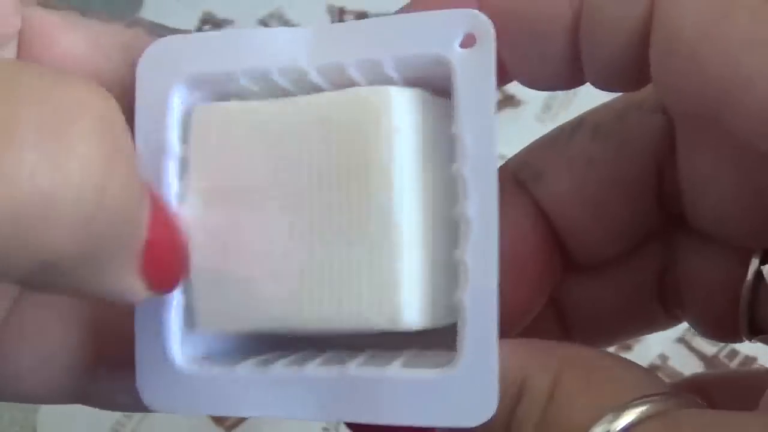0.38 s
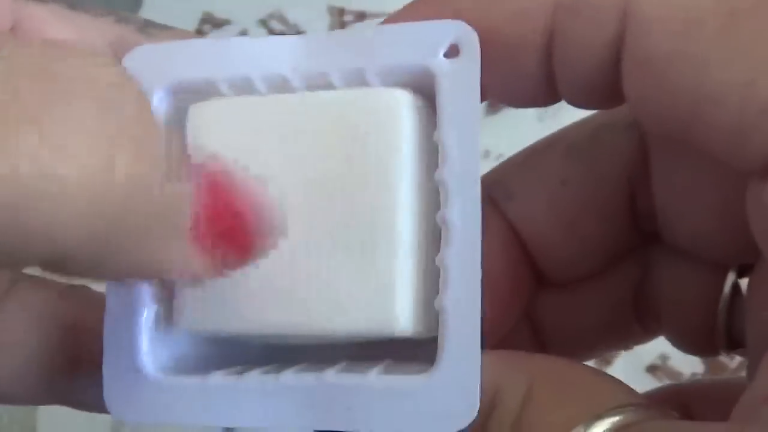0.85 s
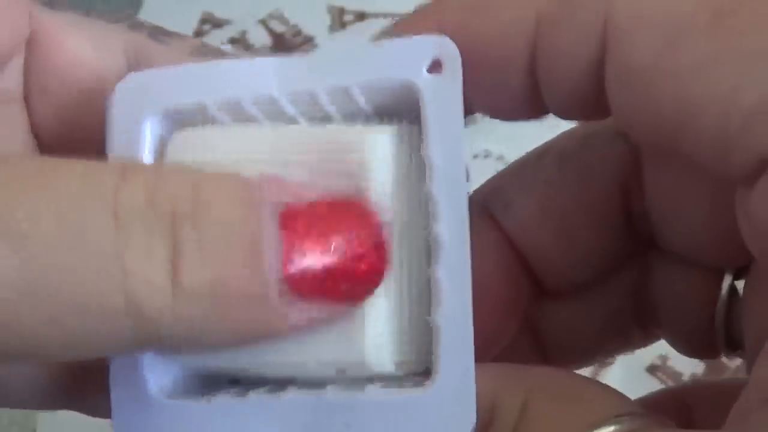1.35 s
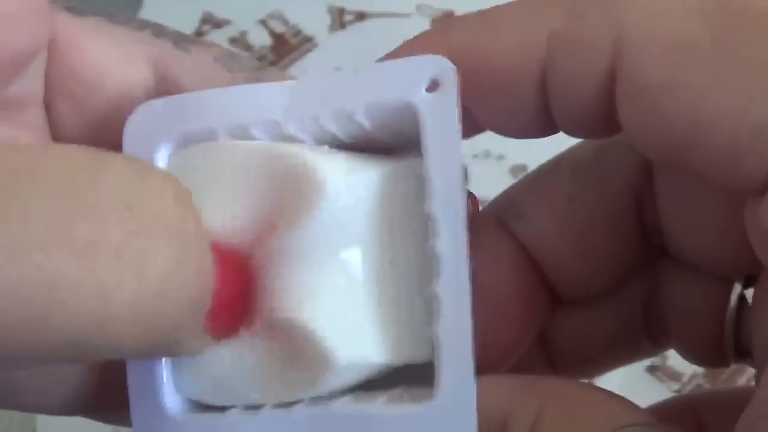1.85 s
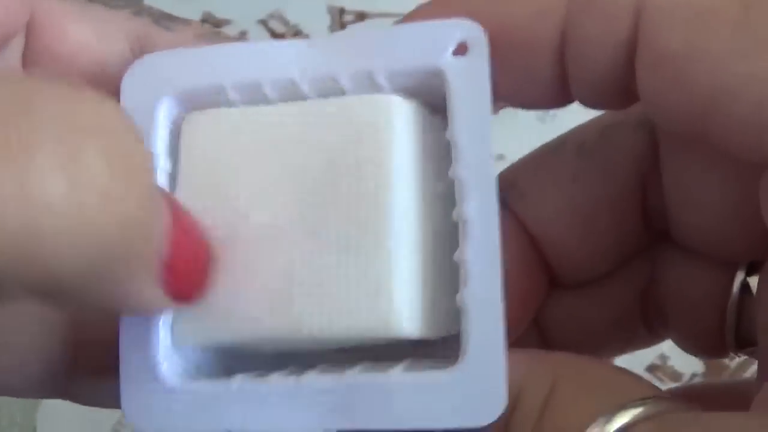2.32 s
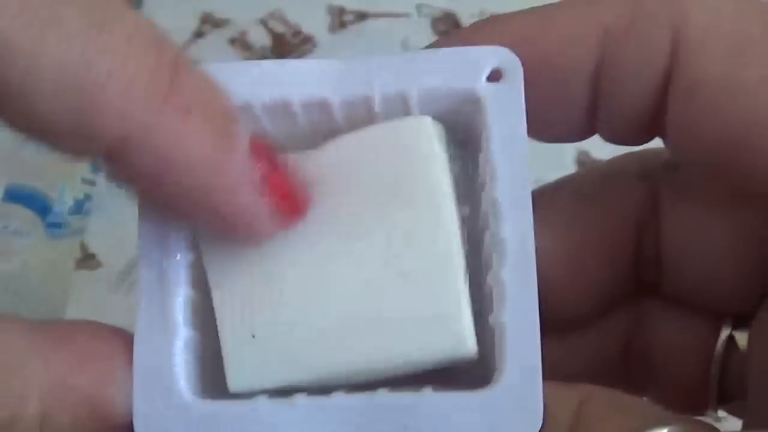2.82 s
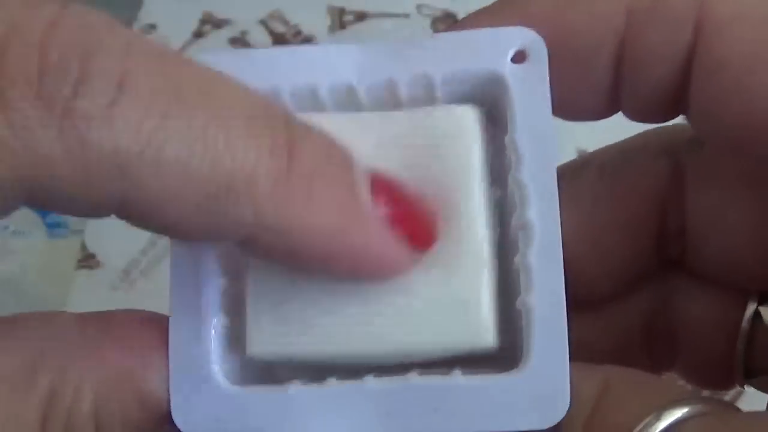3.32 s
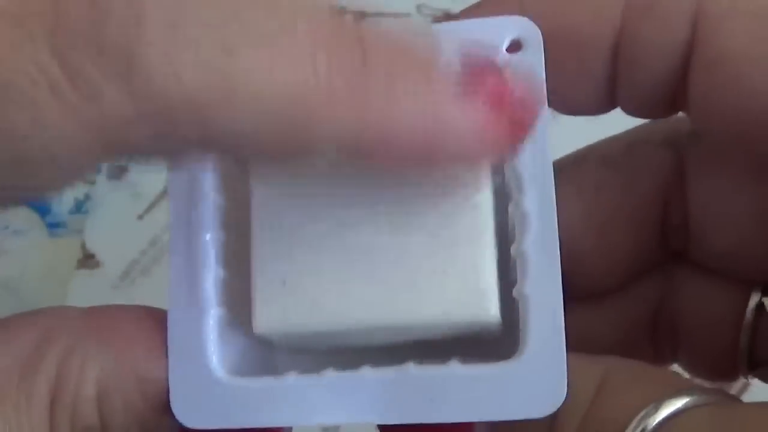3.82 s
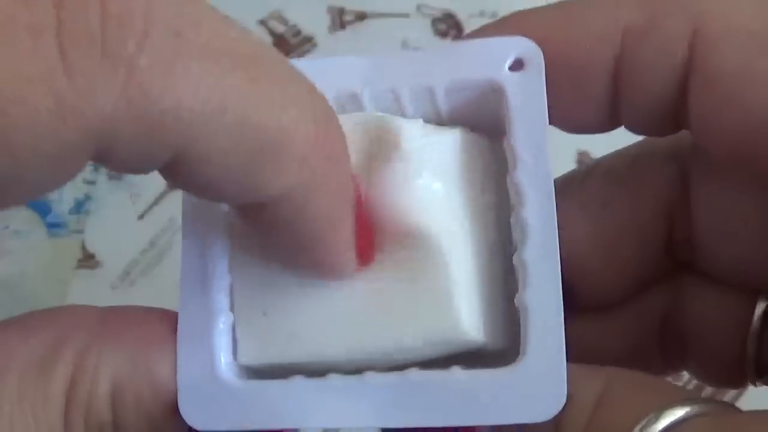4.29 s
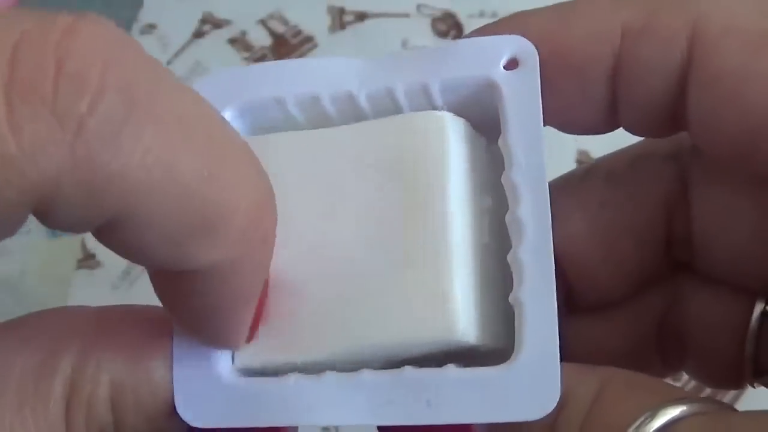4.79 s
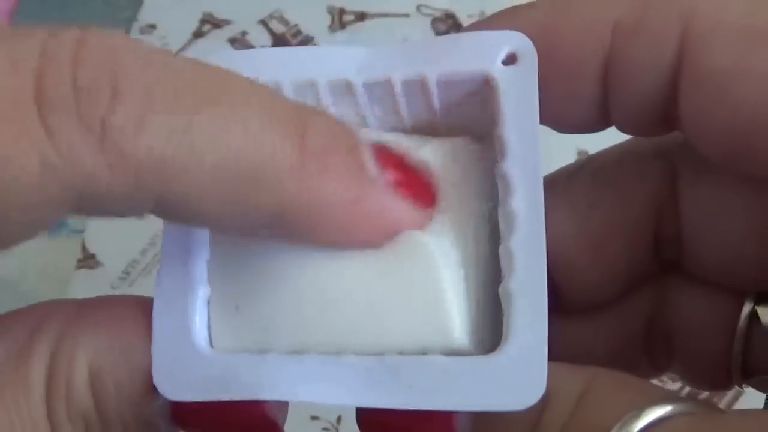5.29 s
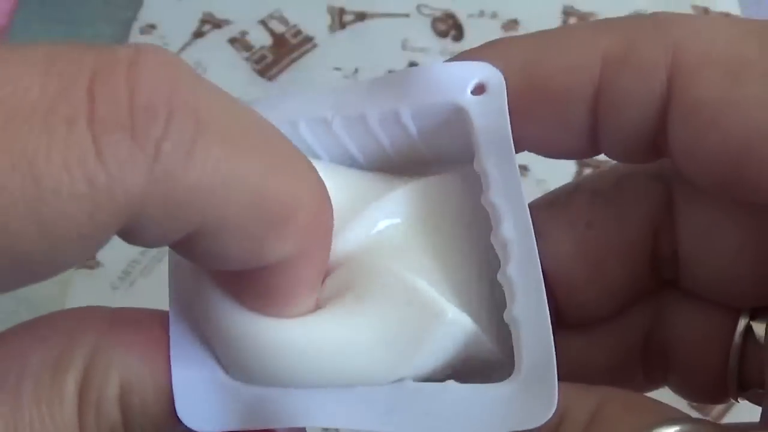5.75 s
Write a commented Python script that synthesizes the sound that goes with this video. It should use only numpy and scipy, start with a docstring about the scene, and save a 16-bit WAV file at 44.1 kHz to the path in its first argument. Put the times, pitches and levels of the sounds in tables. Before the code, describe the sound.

Sticky snaps, clicks and fine crackle as a finger peels and presses a tacky soft toy in a small thin plastic tray.

```python
"""Sticky pops, clicks and fine crackle: a finger presses a tacky soft toy in a thin plastic tray, heard close up.
Each pop is a ragged, snapping noise burst through three resonators: low air gap, tray wall, high sticky film.
One sharp click near 4.48 s, not a peel, is built alike. Random grains ring the same parts for the crackle;
smooth noise makes the fingertip's sliding hiss and soft pats make the gap hum. Behind lie a fridge-like motor hum
of wavering sines, coloured room noise, swelling rumble, a few dull thuds and a faint throbbing camera whine."""
import sys
import numpy as np
from scipy import signal
from scipy.fft import rfft, irfft
from scipy.io import wavfile
from scipy.ndimage import uniform_filter1d

SR = 44100
rng = np.random.default_rng(int(sys.argv[2]) if len(sys.argv) > 2 else 0)


def pcm_store(signal):
    """Save signal as 16-bit PCM."""
    levels = np.round(np.clip(np.atleast_2d(signal), -1, 1) * 32767)
    wavfile.write(sys.argv[1], SR, levels.astype(np.int16).T)


def level_to_linear(level):
    """Convert decibel levels to linear amplitude factors, elementwise."""
    exponent = np.asarray(level, float) / 20
    return 10 ** exponent


N = 259749
LEAD = 128  # samples of ragged noise ahead of each snap

# Pops of the peeling toy, and at 4.4777 s a sharp click that is not a peel; peak levels before the bass cut:
# (time [s], air gap pitch [Hz], air gap level [dB], tray wall level [dB], film crack level [dB])
POPS_AND_CLICK = [(0.0101,2230,-49,-33,-33),(.033,2260,-48,-35.5,-39),(.0776,2060,-47,-37.5,-39),(0.0883,660,-67,-35,-34.5),(.101,1560,-58,-47,-31),
                  (0.3144,2140,-50,-43,-37),(.353,2130,-59,-24,-27),(0.3577,1590,-37,-26,-41),(0.375,2050,-41,-37,-39),(0.382,2180,-42,-50,-44),(.3892,1920,-39,-35,-40),(.396,1920,-65,-35,-45),
                  (.4032,1350,-32.5,-28,-30),(0.42,1870,-48,-35,-40),(0.4366,1670,-54,-34,-46),(.4447,1330,-50,-36,-39),(.459,810,-48,-49,-45),(.4873,798,-27,-20.5,-30),
                  (.632,800,-52,-38,-36),(0.662,731,-31.5,-22,-23.5),(0.665,788,-30,-29.5,-29),(.7164,1100,-44,-47,-29),(0.7755,1060,-57,-40,-23.5),
                  (.8385,1390,-33,-25.5,-23.5),(0.8492,835,-46,-33,-43),(0.8677,914,-28,-24.5,-22.5),(.8705,786,-37,-22.5,-19.5),(1.084,1140,-40,-53,-25),
                  (1.1459,1680,-33,-36,-31),(1.1538,650,-58,-40,-38),(1.171,960,-47,-33.5,-31.5),(1.1902,1310,-38,-31,-30),(1.2094,1150,-54,-30,-30.5),(1.2228,1840,-35,-32,-61),
                  (1.2362,2080,-35,-30,-26),(1.2396,750,-52,-26,-22.5),(1.2429,760,-32,-24.5,-22),(1.252,760,-48,-40,-32),(1.3596,990,-40.5,-48,-43),(1.4338,1230,-53,-45,-41),(1.4522,1270,-38.5,-57,-50),
                  (1.475,1100,-45,-37,-30),(1.5599,1050,-35.5,-46,-27),(1.584,770,-50,-32,-25),(1.601,1350,-25.5,-22,-23.5),(1.613,1030,-65,-42,-36),(1.622,1880,-58,-40,-39),(1.632,760,-53.5,-33,-32),
                  (1.6512,1840,-52,-44,-27),(1.66,1790,-45,-22.5,-24.5),(1.6622,1780,-32,-33,-32),(1.674,760,-25.5,-24,-24),(1.6959,900,-63,-44,-43),(1.847,1540,-43,-51,-28),
                  (1.9529,2000,-45,-35,-39),(1.9733,1350,-28,-23.5,-23.5),(1.9901,1860,-53,-32,-43),(1.9992,1550,-46,-31,-41),(2.0078,2160,-43,-32,-41),
                  (2.024,1860,-45,-29,-22),(2.034,1750,-40,-25,-37),(2.038,1810,-59,-50,-29.5),(2.044,1870,-58,-38,-26),(2.05,1850,-46,-34,-30),(2.0548,1900,-26.5,-14.5,-10.5),
                  (2.0611,783,-29,-23,-25.5),(2.1558,990,-44.5,-61,-60),(2.1771,800,-50,-47,-28.5),(2.2603,1120,-52,-49,-24.5),(2.2967,1070,-50,-58,-29),(2.3082,660,-56,-46,-34),
                  (2.322,1110,-59,-33.5,-27),(2.346,1350,-33,-23.5,-24.5),(2.3545,1390,-60,-29,-31),(2.3826,765,-46,-33.5,-40),(2.401,1870,-40,-27,-21.5),
                  (2.412,760,-26,-23,-23.5),(2.6824,680,-68,-40,-28),(2.7802,1940,-38,-33.5,-20),(2.8682,1070,-36,-42.5,-26),(2.97,1730,-54,-47,-34),(3.1003,1430,-28,-32,-36.5),
                  (3.124,740,-40.5,-38,-39),(3.1344,863,-27.5,-25.5,-26),(3.14,815,-14,-13.5,-8.5),(3.15,2220,-27,-28,-26),(3.154,1940,-29,-31,-26),
                  (3.181,1340,-45,-44,-42),(3.4444,783,-30.5,-23.5,-27),(3.4489,1630,-36,-31,-24.5),(3.675,910,-47,-53,-29.5),(3.6833,955,-52,-56,-38),(3.6927,1090,-42,-53,-25),(3.6973,1080,-40.5,-33,-20),
                  (3.7225,900,-29.5,-30,-32),(3.7271,1015,-21.5,-25.5,-15),(3.7295,1970,-50,-18,-19),(3.7445,720,-38,-30.5,-25),(3.88,790,-30.5,-12.5,-22),(3.8827,860,-31.5,-18.5,-14),
                  (3.888,850,-36,-24.5,-30),(3.921,1060,-42,-49,-45),(3.925,1100,-42,-42,-34.5),(3.9613,1750,-28,-40,-35),(3.966,940,-34,-26.5,-32),(3.9718,966,-21.5,-16.5,-23),
                  (3.9828,1270,-33,-40,-39),(3.9947,805,-47,-46,-32),(4.0238,1200,-61,-46,-42),(4.1632,1660,-41,-32,-29.5),(4.2959,1380,-40.5,-41,-31),
                  (4.4777,1140,-38.5,-38,-25.5),(4.613,1770,-65,-42,-45),(4.64,1500,-56,-46,-40),(4.662,1500,-64,-46,-50),(4.697,1500,-62,-50,-57),(4.734,910,-63,-43,-45),(4.75,2150,-57,-31,-37),(4.763,2240,-52,-40,-29),(4.7667,2340,-26,-37,-31),(4.7704,2200,-39,-39,-44),
                  (4.783,2170,-62.5,-32,-38),(4.823,700,-58,-52,-30),(4.8375,1750,-41,-41,-27),(4.8457,1860,-43,-40,-27),(4.8577,1520,-31,-30.5,-35),
                  (4.875,1110,-51,-40,-41),(5.0946,1930,-53,-47,-29),(5.214,760,-54,-40.5,-58),(5.328,780,-56,-52,-35),(5.385,800,-62,-68,-44),(5.7995,2160,-47,-37.5,-37),(5.8462,810,-82,-44,-31.5),(5.8775,2300,-41,-47,-28)]
# Fingertip pats on the toy, with peak levels before the bass cut:
# (time [s], air gap pitch [Hz], length [s], level [dB])
FINGER_PATS = [(0.704, 1110, 0.028, -48), (0.767, 1040, 0.016, -43), (0.797, 1000, 0.019, -54),
               (1.066, 1190, 0.014, -40), (1.075, 1100, 0.014, -46), (1.445, 1080, 0.017, -43),
               (1.849, 1100, 0.03, -46), (2.257, 1100, 0.026, -50), (2.71, 830, 0.015, -59),
               (2.802, 816, 0.02, -55), (3.417, 940, 0.013, -50), (3.664, 1040, 0.032, -49),
               (3.91, 1020, 0.025, -45), (4.219, 1120, 0.05, -53.5), (4.324, 1100, 0.02, -56)]
# Resonances of the thin tray wall: (frequency [Hz], t60 [s], relative level [dB])
WALL_MODES = [(3040, 0.0015, -8), (3802, 0.0037, 7.5), (4277, 0.0076, 1), (4800, 0.0015, 6)]
# Resonances of the sticky film: (frequency [Hz], t60 [s], relative level [dB])
FILM_MODES = [(7060, 0.0016, 1.2), (8330, 0.0031, 1.41), (9460, 0.0029, 2.2), (11880, 0.0018, 4.5)]


def timeline():
    """Seconds of each sample."""
    return np.arange(N) / SR


def unit(x):
    """Scale to rms 1."""
    return x / np.sqrt(np.mean(x ** 2))


def walk(rate):
    """Random levels held 1 / rate s and smoothed twice into a slow drift of rms 1."""
    hold = int(SR / rate)
    steps = np.repeat(rng.standard_normal(N // hold + 1), hold)
    smooth = uniform_filter1d(uniform_filter1d(steps, hold), hold)
    return unit(smooth[:N])


def colour(points):
    """Noise shaped to a spectrum of (frequency [Hz], relative level [dB]) points."""
    hz, db = np.transpose(points)
    f = np.maximum(np.fft.rfftfreq(N, 1 / SR), 1)
    shape = level_to_linear(np.interp(np.log(f), np.log(hz), db))
    return irfft(rfft(rng.standard_normal(N)) * shape, N)


def ring(modes, detune=0.):
    """Impulse response of decaying modes; neighbours swing in opposite senses."""
    t = np.arange(2048) / SR
    hz, t60, db = np.transpose(modes)[:, :, None]
    sign = (-1) ** np.arange(len(modes))[:, None]
    swing = np.sin(2 * np.pi * hz * (1 + detune) * t)
    decay = 1000. ** (-t / t60)
    return np.sum(sign * level_to_linear(db) * swing * decay, axis=0)


def burst(noise, rise_s, fall_s):
    """Ragged noise grows ever harder, as a tearing bond does, snaps and dies."""
    snap_size = 3.2  # final break against the ragged noise around it
    t = (np.arange(len(noise)) - LEAD) / SR
    ragged = noise * np.exp(np.where(t < 0, t / rise_s, -t / fall_s))
    snap = snap_size * np.sign(noise[0]) * (t == 0)
    return ragged + snap


def strike(push, response, db):
    """A push rings a resonator; the result peaks at db."""
    y = signal.fftconvolve(push, response)
    return y * level_to_linear(db) / np.abs(y).max()


def swells(start, hold, db, swell, fade, rest_db):
    """Gain of events that rise, hold and fall by straight slopes in dB/s over a resting level."""
    power = np.full(N, level_to_linear(2 * rest_db))
    for s, h, peak in zip(start, hold, db):
        first = max(int((s - 0.1) * SR), 0)
        last = min(int((s + h + 0.1) * SR), N)
        i = np.arange(first, last)
        t = i / SR - s
        level = peak + swell * np.minimum(t, 0) - fade * np.maximum(t - h, 0)
        power[i] += level_to_linear(2 * level)
    return np.sqrt(power)


def pops(rise_s, fall_s, detune):
    """Each peel pops once, the tray bent anew so that modes shift; the lone click is built the same way."""
    # ring time of a deep gap; tighter, higher gaps die sooner
    deep_t60_s, deep_hz, slope = 0.018, 800, 1.4
    out = np.zeros(N + 4096)
    noise = rng.standard_normal((len(POPS_AND_CLICK), 3, 256))
    shift = rng.standard_normal((len(POPS_AND_CLICK), 2, 4, 1))
    for (s, hz, gap_db, wall_db, film_db), n, d in zip(POPS_AND_CLICK, noise, shift):
        # the gap rings on its own pitch and spills a short broad knock around it
        gap_t60 = deep_t60_s * (deep_hz / hz) ** slope
        cavity = [(hz, gap_t60, 0), (1350, 0.004, -2), (1900, 0.006, -6)]
        pop = strike(burst(n[0], 0.00017, 0.00036), ring(cavity), gap_db)
        pop = pop + strike(burst(n[1], rise_s, fall_s), ring(WALL_MODES, detune * d[0]), wall_db)
        pop = pop + strike(burst(n[2], rise_s, fall_s), ring(FILM_MODES, detune * d[1]), film_db)
        i = int(s * SR)
        out[i:i + len(pop)] += pop
    return out[LEAD:N + LEAD]  # each burst breaks on its listed time


def drag(rate, spread_db, smooth):
    """Many tiny bonds let go at random over a smooth skin hiss, and ring film, wall and air gap."""
    # Strokes of the toy peeling off the walls, rms levels before the bass cut:
    # (start [s], hold [s], film level [dB], tray wall level [dB])
    strokes = [(0, 0.065, -57.5, -59.5), (0.11, 0.41, -66.5, -68.5), (0.351, 0.093, -50, -54),
               (0.649, 0.0096, -53, -60), (0.807, 0.063, -52.5, -59.5), (1.138, 0.11, -55, -58.5),
               (1.53, 0.13, -56, -60.5), (1.661, .005, -44.5, -45), (1.911, 0.1, -55.5, -58.5),
               (1.982, 0.079, -52, -55.5), (2.296, 0.073, -55.5, -59), (2.406, 0.0026, -42, -44),
               (2.432, 0.054, -58, -67), (2.795, 0.0036, -45, -46.5), (2.861, 0.0038, -54, -73),
               (3.102, 0.052, -46, -53), (3.437, 0.0024, -51, -58), (3.678, 0.071, -50.5, -56),
               (3.895, 0.0032, -59, -58), (3.904, 0.033, -52.5, -60), (3.97, 0.0034, -38, -44.5),
               (4.16, 0.0018, -60, -60), (4.233, 0.056, -64, -85), (4.59, 0.17, -70, -71.5),
               (4.77, .005, -44, -46.5), (4.85, 0.0062, -41.5, -47), (5.645, 0.17, -67, -74)]
    # Broad resonances of the air gap: (frequency [Hz], t60 [s], relative level [dB])
    gap_modes = [(800, 0.039, 2.5), (1100, 0.004, -3), (1350, 0.038, -1.5), (1870, 0.0025, 20)]
    swell, fade = 607, 695  # strokes [dB/s]
    # gap crackle at each pop, the click and each pat [dB, dB/s]
    flutter_db, flutter_swell, flutter_fade = -20, 2500, 1010
    film_rest_db, gap_rest_db = -71.5, -81  # under a resting finger

    start, hold, film_db, wall_db = np.transpose(strokes)
    pop_knocks = [(s, 0, gap_db) for s, _, gap_db, _, _ in POPS_AND_CLICK]
    pat_knocks = [(s, length, db) for s, _, length, db in FINGER_PATS]
    knock_start, knock_hold, knock_db = np.array(pop_knocks + pat_knocks).T
    film_gain = swells(start, hold, film_db, swell, fade, film_rest_db)
    wall_gain = swells(start, hold, wall_db, swell, fade, -np.inf)
    gap_gain = swells(knock_start, knock_hold, knock_db + flutter_db,
                      flutter_swell, flutter_fade, gap_rest_db)

    size = level_to_linear(spread_db * np.minimum(rng.exponential(size=N), 2.5))
    released = rng.random(N) < rate / SR  # rate in grains per second
    grains = unit(released * size * rng.standard_normal(N))
    out = 0
    for modes, gain in ((FILM_MODES, film_gain), (WALL_MODES, wall_gain), (gap_modes, gap_gain)):
        push = grains + smooth * rng.standard_normal(N)
        out = out + unit(signal.fftconvolve(push, ring(modes))[:N]) * gain
    return out


def slides():
    """The fingertip slides over the toy: even skin hiss rings the film and the tray wall."""
    # Smooth slides, rms levels before the bass cut:
    # (start [s], hold [s], film level [dB], tray wall level [dB])
    glides = [(0.476, 0.078, -63, -70), (0.713, 0.012, -50.5, -65), (0.77, .005, -53, -65),
              (1.073, 0.0032, -44.5, -55), (1.443, 0.014, -47, -60.5), (1.849, 0.0052, -45.5, -60),
              (2.254, 0.011, -46.5, -66), (2.705, 0.013, -46, -59), (2.928, 0.1, -59, -66.5),
              (3.184, 0.046, -63, -64.5), (3.425, 0.013, -52.5, -65), (4.533, 0.0077, -51, -63),
              (5.127, 0.083, -54, -62), (5.33, 0.018, -61.5, -84)]
    swell, fade = 800, 505  # [dB/s]
    start, hold, film_db, wall_db = np.transpose(glides)
    out = 0
    for modes, db in ((FILM_MODES, film_db), (WALL_MODES, wall_db)):
        hiss = unit(signal.fftconvolve(rng.standard_normal(N), ring(modes))[:N])
        out = out + hiss * swells(start, hold, db, swell, fade, -np.inf)
    return out


def pats(t60):
    """A soft fingertip lands on the toy: a slow rough push makes the gap hum briefly."""
    out = np.zeros(N + 8192)
    noise = rng.standard_normal((len(FINGER_PATS), 4096))
    for (s, hz, length, db), n in zip(FINGER_PATS, noise):
        samples = int(length * SR)
        push = n[:samples] * np.hanning(samples)
        pat = strike(push, ring([(hz, t60, 0)]), db)
        i = int(s * SR)
        out[i:i + len(pat)] += pat
    return out[:N]


def echoes(t60):
    """Impulse response of a noisy tail from hands, table and walls, building up softly, energy 1."""
    t = np.arange(8192) / SR
    tail = rng.standard_normal(len(t)) * (1 - np.exp(-t / 0.0047)) * 1000. ** (-t / t60)
    return tail / np.sqrt(np.sum(tail ** 2))


def hum():
    """Motor partials, each a sine wavering slowly in level."""
    # Partials of the motor: (frequency [Hz], rms level [dB], waver [dB])
    partials = [(46.2, -61, 2), (89.8, -64.5, 2), (121.7, -62.5, -2.5), (139, -58.5, 3.2),
                (185.5, -66.5, -1.5), (210.8, -72.5, -4.5)]
    out = 0
    for hz, db, waver_db in partials:
        gain = np.sqrt(2) * level_to_linear(db + waver_db * np.tanh(walk(2.58)))
        out = out + gain * np.sin(2 * np.pi * (hz * timeline() + rng.random()))
    return out


def room():
    """Air and hiss drifting slightly in level; narrow in the bass, widest near 1.2 kHz."""
    # Spectrum of the room noise: (frequency [Hz], relative density [dB])
    spectrum = [(20, -56), (40, 1), (80, -8), (130, -10.5), (250, -14.5), (400, -17.5), (1200, -25.5),
                (3500, -28.5), (10000, -36.5), (12000, -35.5)]
    # Side minus mid of the room noise: (frequency [Hz], difference [dB])
    side_balance = [(60, -29), (110, -25), (190, -8.5), (350, -9.5), (620, 7), (1110, 4), (1990, -25),
                    (3570, -2), (6410, 25), (11500, -19)]
    level_db = -57.5  # rms of the mid
    mid = colour(spectrum)
    hz, db = np.transpose(spectrum)
    wide_hz, wide_db = np.transpose(side_balance)
    side_db = db + np.interp(np.log(hz), np.log(wide_hz), wide_db)
    side = colour(list(zip(hz, side_db)))
    gain = level_to_linear(level_db + 0.84 * walk(3.1)) / np.std(mid)
    return mid * gain, side * gain


def rumble():
    """Low noise from beyond the walls that comes and goes."""
    # Swelling of the distant rumble: (time [s], level [dB])
    swelling = [(0, -69.5), (1.5, -71), (2.3, -66), (2.7, -75.5), (3.5, -61.5), (4.15, -60.5), (4.36, -57),
                (4.42, -53), (4.5, -59), (4.65, -61), (5, -66), (5.35, -63), (5.62, -54.5), (5.749, -56.5),
                (5.89, -59)]
    s, db = np.transpose(swelling)
    body = unit(colour([(120, -6), (200, 1), (330, -0.5), (480, -11), (900, -16.5), (2000, -63)]))
    return body * level_to_linear(np.interp(timeline(), s, db) + 3.9 * walk(15))


def thud():
    """Soft thuds elsewhere in the house: dull decaying modes with a slow rise."""
    # Thud modes, levels before the rise and decay: (time [s], frequency [Hz], t60 [s], level [dB])
    thumps = [(3.69, 220, 0.11, -38), (4.39, 80, 0.15, -34), (4.385, 520, 0.065, -50)]
    out = 0
    for s, hz, t60, db in thumps:
        t = np.maximum(timeline() - s, 0)
        envelope = (1 - np.exp(-t / 0.0023)) * 1000. ** (-t / t60)
        out = out + level_to_linear(db) * envelope * np.sin(2 * np.pi * hz * t)
    return out


def whine(db):
    """The camera's electronics leak a thin tone that throbs once a frame."""
    pitch_hz, frame_hz, frame_peak = 3971, 29.97, 0.54  # frame_peak: place of the peak in a frame, 0 to 1
    throb = np.cos(np.pi * (frame_hz * timeline() - frame_peak)) ** 2
    return level_to_linear(db + 2.0 * walk(12)) * throb ** 2 * np.sin(2 * np.pi * pitch_hz * timeline())


def scene():
    """Tray in the centre, short reflections that differ left and right, room behind."""
    tray = pops(rise_s=0.00013, fall_s=0.0004, detune=0.055)
    tray = tray + drag(rate=1400, spread_db=7.0, smooth=0.52) + slides() + pats(t60=0.045)
    # so small an object radiates little bass
    bass_cut = signal.butter(2, 420, "high", fs=SR, output="sos")
    tray = signal.sosfilt(bass_cut, tray)
    side_echo = level_to_linear(-17) * signal.fftconvolve(tray, echoes(0.025))[:N]
    mid_echo = level_to_linear(-9) * signal.fftconvolve(tray, echoes(0.011))[:N]
    room_mid, room_side = room()
    mid = tray + mid_echo + room_mid + hum() + rumble() + thud()
    side = side_echo + room_side
    return np.array([mid + side, mid - side])


def top_cut(x):
    """Nothing passes above the cut-off."""
    return signal.sosfilt(signal.butter(12, 12090, fs=SR, output="sos"), x)


def record(dry):
    """The camera adds its whine and cuts the top steeply."""
    taps = signal.firwin(161, 11050, window=("kaiser", 2.5), fs=SR)  # low-pass [Hz]
    mix = signal.fftconvolve(dry + whine(db=-68.0), taps[None], mode="same")
    return top_cut(mix)


dry = scene()
out = record(dry)
pcm_store(out)
```